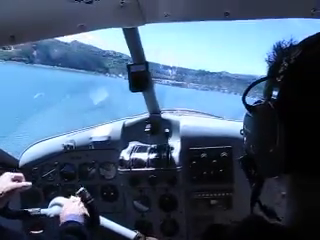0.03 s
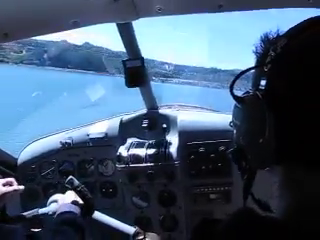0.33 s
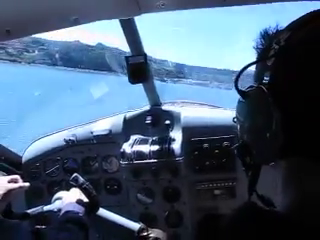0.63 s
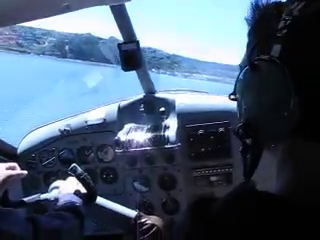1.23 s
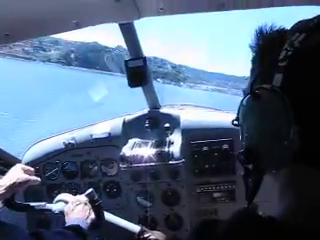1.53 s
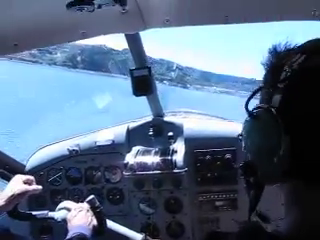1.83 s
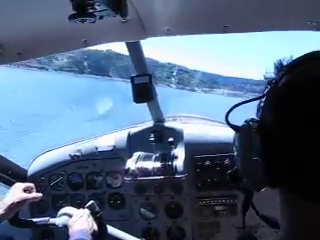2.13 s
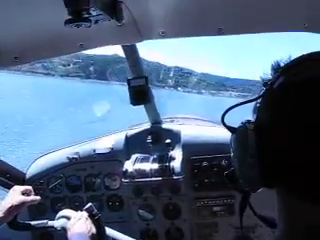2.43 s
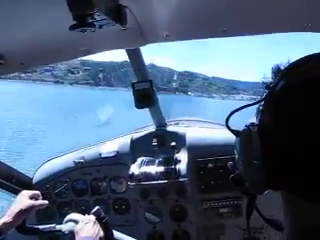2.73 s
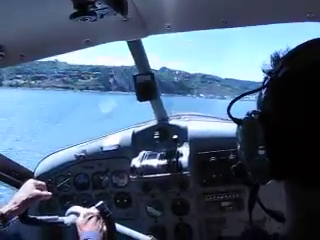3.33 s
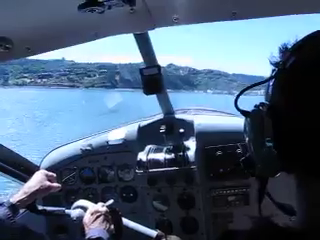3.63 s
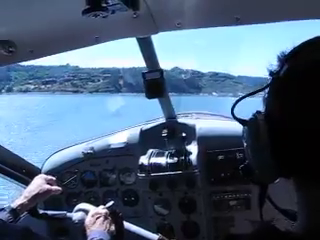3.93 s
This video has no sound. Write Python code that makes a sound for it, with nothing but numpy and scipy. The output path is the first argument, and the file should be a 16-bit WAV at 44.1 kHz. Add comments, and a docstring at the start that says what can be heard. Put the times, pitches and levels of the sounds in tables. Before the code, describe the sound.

A small propeller plane drones loudly in flight, heard from the cockpit with rushing air.

```python
"""Seaplane cockpit in flight. A nine-cylinder radial engine and a three-blade propeller drone together,
beating against each other while the speed sags a little. Gears whine faintly, the cabin rumbles and
the slipstream hisses over the windscreen. The loud drone is limited and its peaks are rounded off."""
import sys
import numpy as np
from scipy import signal
from scipy.fft import rfft, irfft, next_fast_len
from scipy.io import wavfile
from scipy.ndimage import uniform_filter1d, minimum_filter1d, map_coordinates

SR = 44100
rng = np.random.default_rng(int(sys.argv[2]) if len(sys.argv) > 2 else 0)


def master(y):
    """Save y as 16-bit WAV."""
    cut = np.clip(np.atleast_2d(y).T, -1, 1)
    pcm = np.round(cut * 32767)  # scale
    wavfile.write(sys.argv[1], SR, pcm.astype(np.int16))


N = 176400

# Windscreen hiss. Each row: frequency in Hz, relative density in dB.
HISS_SPECTRUM = [(300, -16.5), (800, -5), (1250, -3), (1600, -3.5), (1950, -4), (2800, -9), (4000, -11.5),
                 (6000, -17.5), (9000, -26), (13000, -34), (15500, -39.5)]
# Hiss drift. Each row: time in seconds, gain in dB.
HISS_GAIN_DB = [(0, 0.5), (.5, 0.5), (1.7, 1), (2.2, -0.3), (2.9, -0.25), (3.5, -0.4), (4, 0)]
# Propeller wash. Each row: frequency in Hz, relative density in dB.
RASP_SPECTRUM = [(600, -27.5), (950, -8), (1250, 1), (1550, -6), (1850, -6.5), (2500, -25)]
# Wash strength. Each row: time in seconds, level in dB.
RASP_DB = [(0, -37), (.8, -38), (1.5, -40.5), (2.3, -44.5), (3.2, -44.5), (3.7, -40), (4, -40.5)]
# Airframe rumble. Each row: frequency in Hz, relative density in dB.
RUMBLE_SPECTRUM = [(15, -24), (25, -17), (34, -5.5), (50, -2.5), (85, 0.5), (125, 0), (165, 0), (210, -8),
                   (300, -11.5), (600, -41.5)]
# Panel roar. Each row: frequency in Hz, relative density in dB.
ROAR_SPECTRUM = [(100, -33.5), (200, -4), (300, 0), (400, -4.5), (500, -7.5), (570, -4), (660, -10.5),
                 (860, -15.5), (1300, -24.5), (3000, -54)]
# Noise width. Each row: frequency in Hz, left-right correlation.
CORRELATION = [(60, 0.97), (110, 0.95), (200, 1.0), (380, 0.95), (700, 0.91), (1290, 0.83), (2380, 0.42),
               (4400, 0.13), (8120, 0.01), (15000, -0.19)]
# Cabin colouring. Each row: frequency in Hz, left minus right in dB.
BALANCE_DB = [(60, 1), (99, 0.0), (160, 0.5), (270, -0.5), (450, 2.0), (740, 0.5), (1220, 1.5), (2010, -3),
              (3330, 2.5), (5500, 3.5), (9080, 1.5), (15000, 2)]
# Crankshaft speed. Each row: time in seconds, turns per second.
CRANK_HZ = [(0, 25.38), (.4, 25.3), (.9, 25.32), (1.6, 25.24), (2.4, 25.13), (3.2, 25.03), (3.6, 25.01),
            (4, 24.92)]
# Gear whine. Each row: multiple of the two-turn cycle rate, level in dB.
GEAR_TONES = [(81, -57), (84, -52), (144, -54.5), (147, -61)]
# Exhaust. Each row: multiple of the two-turn cycle rate, level in dB.
EXHAUST_TONES = [(3, -44), (4, -30), (5, -41), (7, -23), (8, -46), (9, -15.5), (10, -27.5), (11, -28),
                 (13, -35.5), (14, -34), (15, -44), (16, -38.5), (17, -38.5), (20, -43.5), (21, -46.5),
                 (23, -39.5), (25, -45), (26, -45.5), (27, -42.5), (29, -44), (31, -43.5), (32, -45),
                 (34, -47.5), (35, -50), (39, -50), (41, -50.5), (43, -52), (44, -48.5), (47, -46.5),
                 (52, -50)]
# Propeller. Each row: multiple of the blade rate, level in dB.
PROPELLER_TONES = [(1, -22.5), (2, -19), (3, -36.5), (4, -38), (5, -47), (6, -41), (8, -45.5), (10, -51.5),
                   (12, -55)]
# Swell of the lowest propeller tone. Each row: time in seconds, gain in dB.
FUNDAMENTAL_GAIN_DB = [(0, 1.5), (1, 3.4), (1.7, 4), (2.1, -.6), (2.6, 2.2), (3.2, 0), (4, 0)]

BLADES, CYLINDERS = 3, 9
RUMBLE_DB, ROAR_DB, HISS_DB = -22.5, -27, -34


def amp(db):
    """Decibels to gain."""
    return 10 ** (np.asarray(db) / 20)


def unit_rms(x):
    """x at rms 1."""
    return x / np.sqrt(np.mean(x ** 2) + 1e-20)


def at_hz(rows, hz):
    """Interpolate (Hz, value) rows on a log axis."""
    row_hz, values = np.transpose(rows)
    return np.interp(np.log(hz + 1), np.log(row_hz + 1), values)


def curve(rows):
    """(s, value) rows as one value per sample."""
    return np.interp(np.arange(N) / SR, *np.transpose(rows))


def wobble(rate_hz):
    """Smooth random curve, rate_hz knots a second."""
    knots = rng.standard_normal(400)
    grid = np.arange(0, N + 64, 64)
    coarse = map_coordinates(knots, [grid * rate_hz / SR + 2], mode="wrap")
    return np.interp(np.arange(N), grid, coarse)


def filtered(x, response):
    """Apply the gain response(hz) by FFT."""
    size = next_fast_len(N + SR // 2)
    return irfft(rfft(x, size) * response(np.fft.rfftfreq(size, 1 / SR)), size)[..., :N]


def rush(spectrum, patchy_db):
    """Stereo noise of rms 1 with patches of random gain; alike in the bass, unrelated in the treble."""
    def mid_side_gain(hz):
        angle = np.arccos(np.clip(at_hz(CORRELATION, hz), -1, 1)) / 2
        rolloff = 1 / (1 + (hz / (2 * spectrum[-1][0])) ** 2)
        return rolloff * amp(at_hz(spectrum, hz)) * [np.cos(angle), np.sin(angle)]

    bins = signal.stft(rng.standard_normal((2, N)), nperseg=512)[2]
    patches = uniform_filter1d(rng.standard_normal(bins.shape[1:]), size=7, axis=0)
    patches = unit_rms(uniform_filter1d(patches, size=12, axis=1))
    pair = signal.istft(bins * amp(patchy_db * patches), nperseg=512)[1][:, :N]
    mid, side = filtered(pair, mid_side_gain)
    return unit_rms(np.array([mid + side, mid - side]))


def tone(cycles, rms_db, waver_db, waver_hz):
    """Sinusoidal pressure wave of wavering level."""
    peak = np.sqrt(2) * amp(rms_db + waver_db * wobble(waver_hz))
    return peak * np.cos(2 * np.pi * cycles + np.pi / 4)


def slipstream(turns):
    """Air hisses over the windscreen and rasps in the propeller wash."""
    blade_pulse = 1 + 0.078 * np.cos(2 * np.pi * BLADES * turns)
    hiss = amp(HISS_DB + curve(HISS_GAIN_DB)) * rush(HISS_SPECTRUM, patchy_db=0.5)
    rasp = amp(curve(RASP_DB)) * rush(RASP_SPECTRUM, patchy_db=1.5)
    flicker = amp(0.14 * wobble(20))
    return blade_pulse * flicker * (hiss + rasp)


def cabin(turns, blade_depth=0.19, firing_depth=0.26):
    """The airframe rumbles; the panels roar, pulsed by blades and firings."""
    chop = 1 + blade_depth * np.cos(2 * np.pi * BLADES * turns)
    chop += firing_depth * np.cos(np.pi * CYLINDERS * turns)
    roar = unit_rms(chop * rush(ROAR_SPECTRUM, patchy_db=1)) * amp(ROAR_DB + 0.43 * wobble(7.4))
    rumble = amp(RUMBLE_DB) * rush(RUMBLE_SPECTRUM, patchy_db=1)
    return rumble + roar


def gears(turns):
    """Thin whines tied to the crankshaft, fading in and out."""
    return sum(tone(round(k) * turns / 2 + .07 * wobble(4.5), db, waver_db=3.5, waver_hz=4.13)
               for k, db in GEAR_TONES)


def exhaust(turns, lag_cycles=.51, smear_cycles=.036):
    """Firing tone plus side tones from unequal cylinders; the pipes delay these, higher ones more."""
    cycles = turns / 2  # each cylinder fires once in two turns
    out = np.zeros(N)
    for multiple, db in EXHAUST_TONES:
        k = round(multiple)
        if k == CYLINDERS:
            out += tone(k * cycles, db, waver_db=1.3, waver_hz=4.29)
        else:
            delayed = cycles - lag_cycles - smear_cycles * k
            out += tone(k * delayed + 0.033 * wobble(3.24), db, waver_db=1.6, waver_hz=2.98)
    return out


def propeller(turns):
    """Each passing blade pushes on the cabin: phase-locked harmonics."""
    out = np.zeros(N)
    for multiple, db in PROPELLER_TONES:
        k = round(multiple)
        swell_db = curve(FUNDAMENTAL_GAIN_DB) if k == 1 else 0
        out += tone(k * BLADES * turns, db + swell_db, waver_db=-0.5, waver_hz=2.6)
    return out


def scene():
    """One crankshaft times all sources; the cabin colours the two sides differently."""
    turns = np.cumsum(curve(CRANK_HZ) + .02 * wobble(5.07)) / SR
    mix = propeller(turns) + exhaust(turns) + gears(turns) + cabin(turns) + slipstream(turns)
    sides = np.array([[1], [-1]])
    return filtered(mix, lambda hz: amp(sides * at_hz(BALANCE_DB, hz) / 2))


def record(dry, threshold=0.65, hold_s=0.0085, ceiling=0.68, knee=4.6, fade_s=.003, top_hz=15700):
    """A fast limiter evens the throb, a soft clip rounds the peaks; then end fades and a low-pass."""
    hold_samples = int(hold_s * SR)
    gain = threshold / np.maximum(np.abs(dry).max(axis=0), threshold)
    limited = dry * uniform_filter1d(minimum_filter1d(gain, hold_samples), hold_samples)
    clipped = limited / (1 + np.abs(limited / ceiling) ** knee) ** (1 / knee)
    faded = clipped * signal.windows.tukey(N, 2 * fade_s * SR / N)
    return filtered(faded, lambda hz: hz < top_hz)


dry = scene()
out = record(dry)
master(out)
```